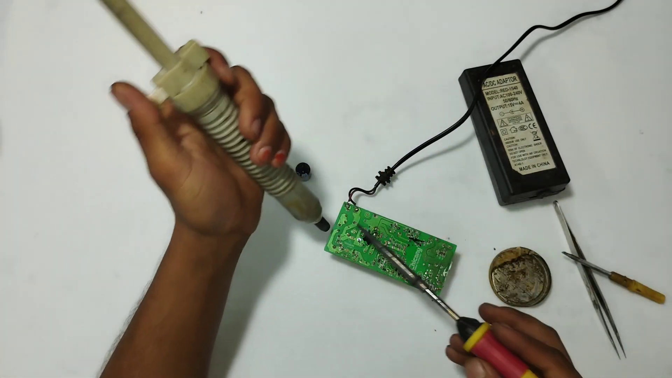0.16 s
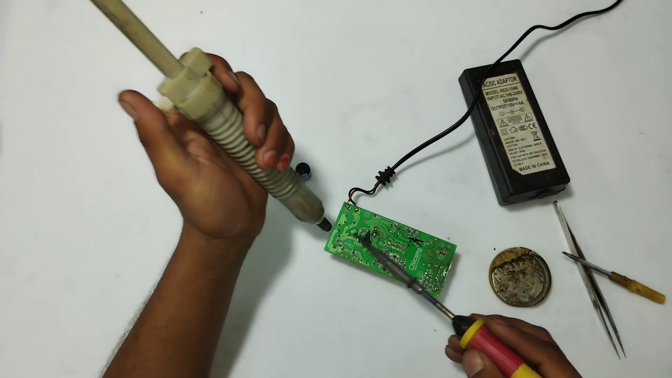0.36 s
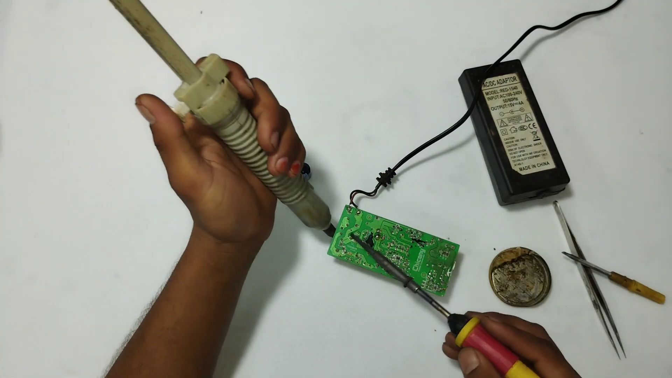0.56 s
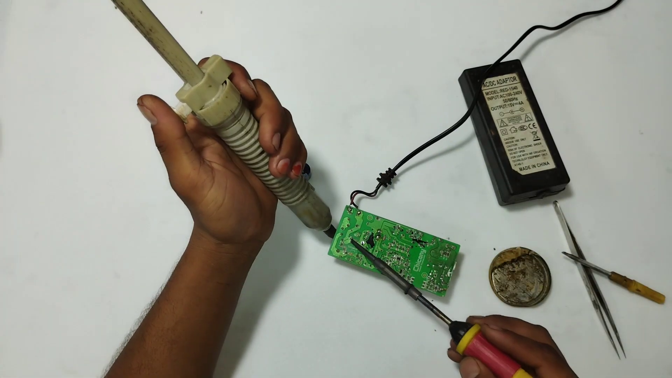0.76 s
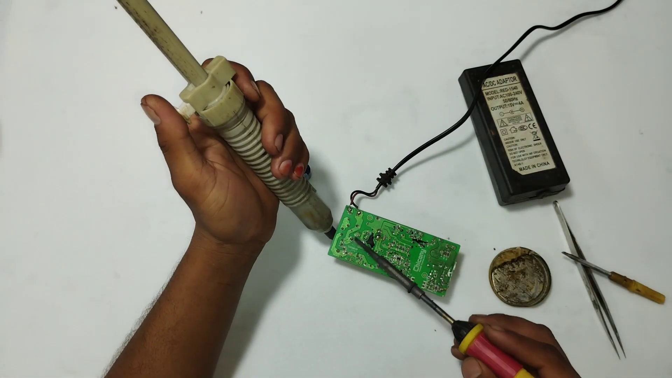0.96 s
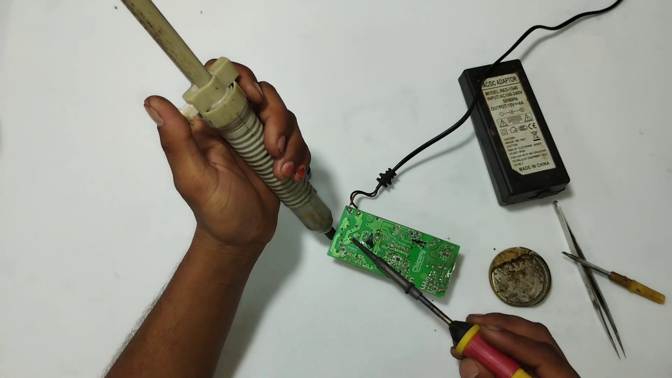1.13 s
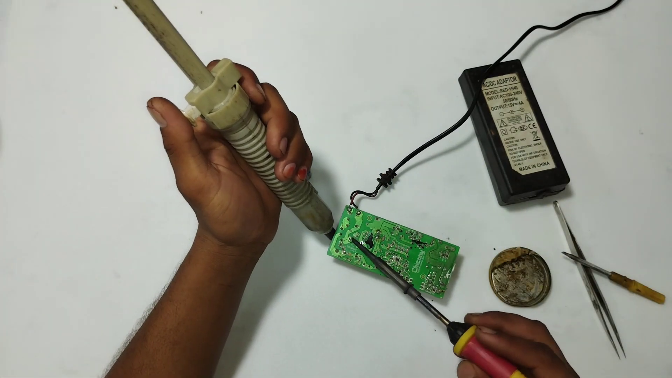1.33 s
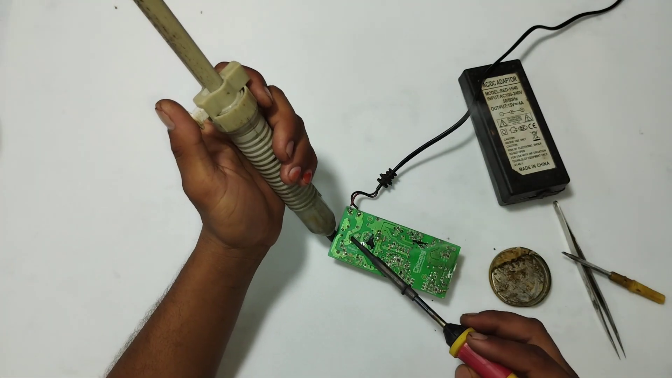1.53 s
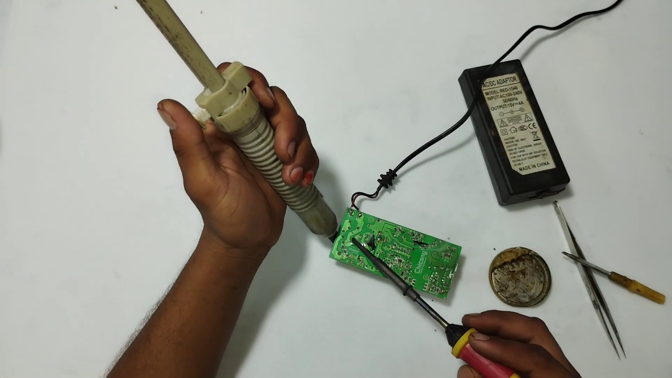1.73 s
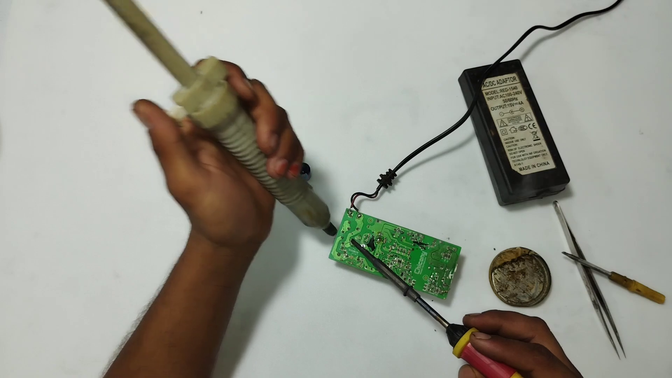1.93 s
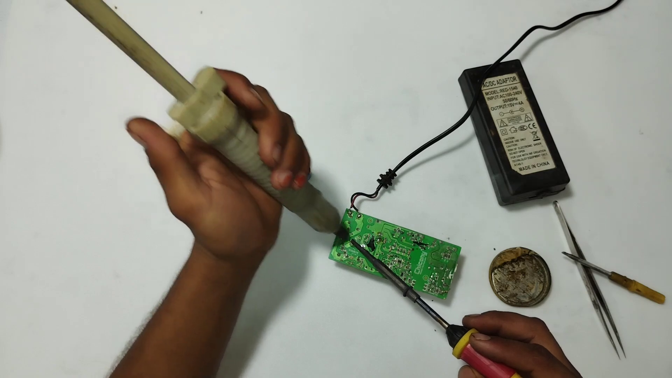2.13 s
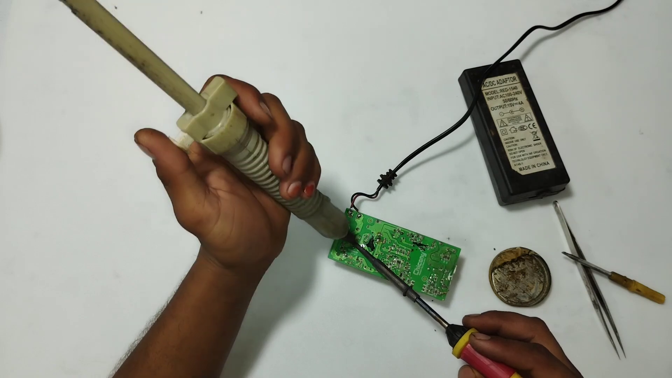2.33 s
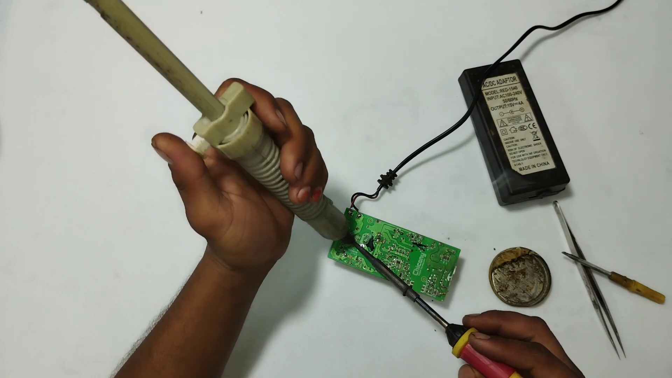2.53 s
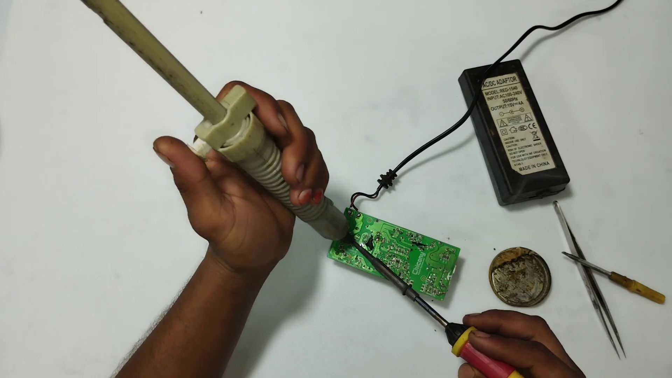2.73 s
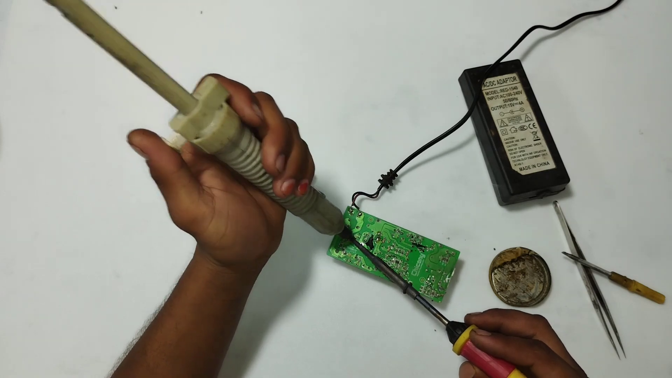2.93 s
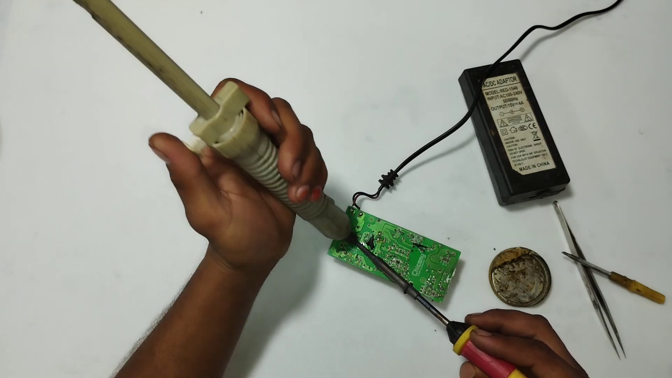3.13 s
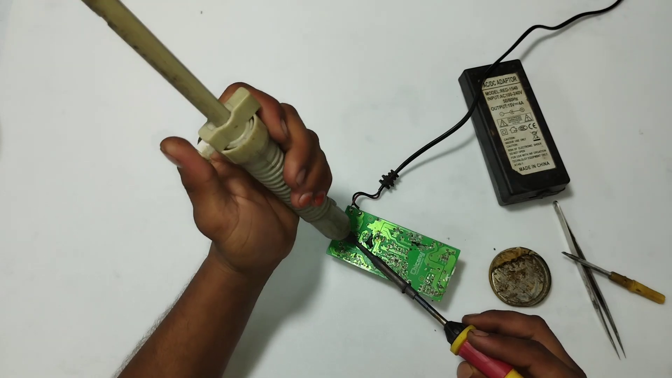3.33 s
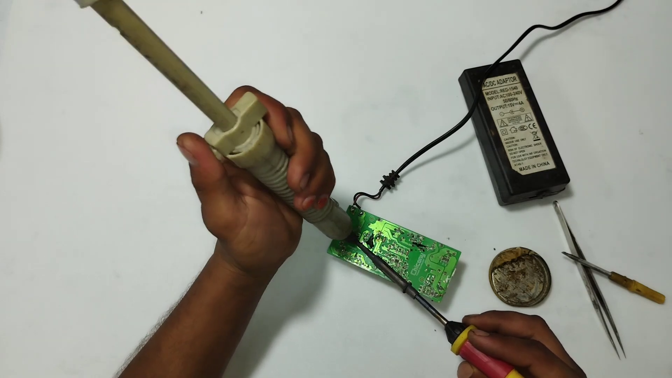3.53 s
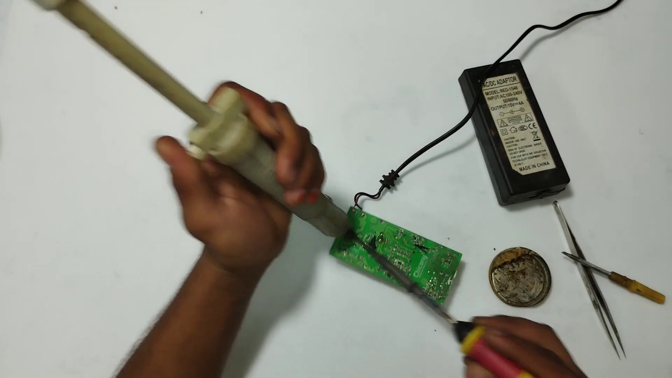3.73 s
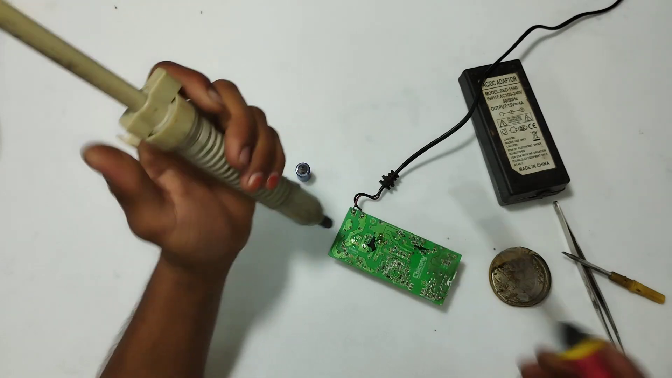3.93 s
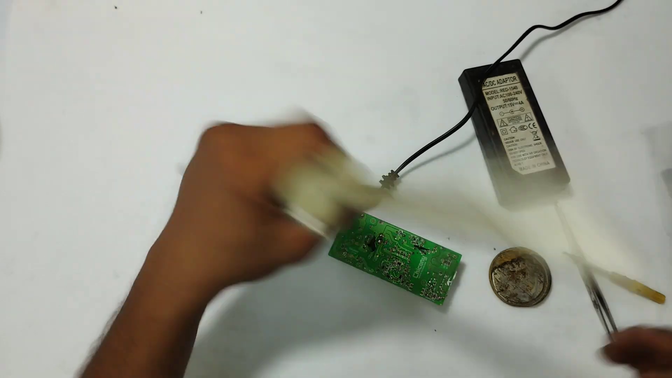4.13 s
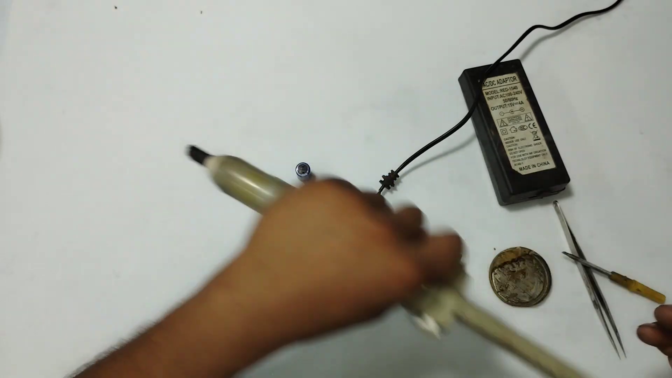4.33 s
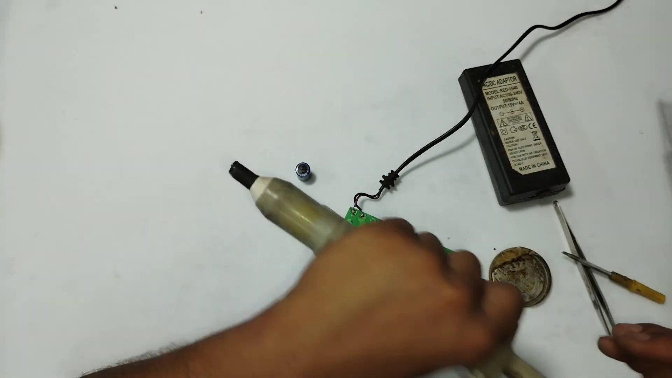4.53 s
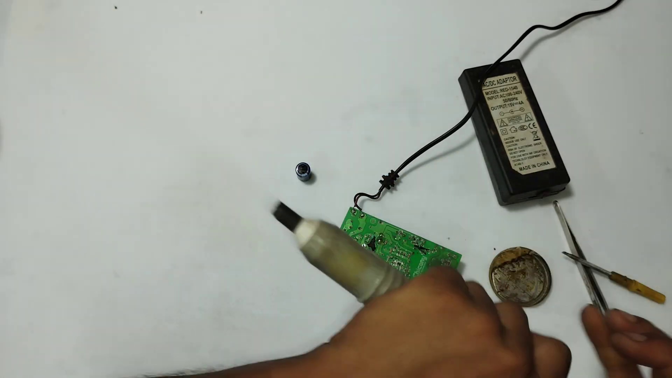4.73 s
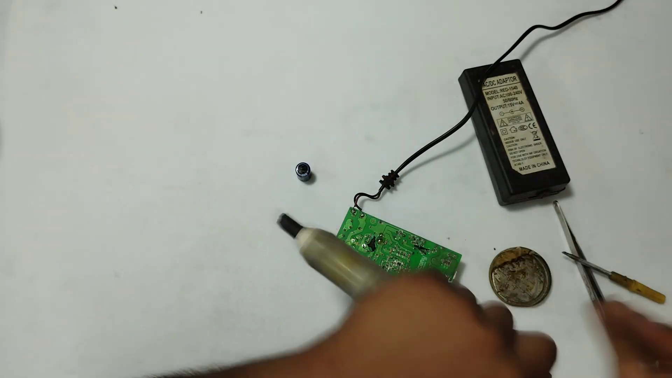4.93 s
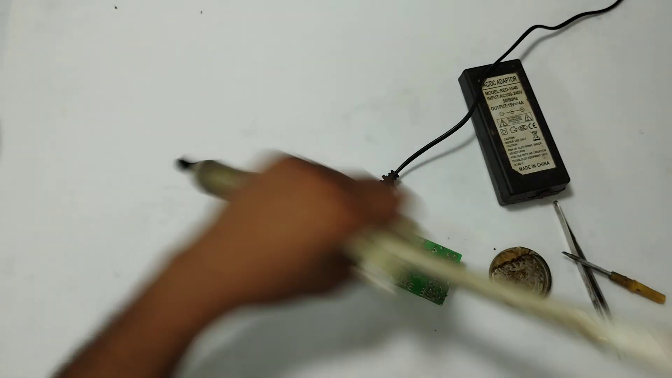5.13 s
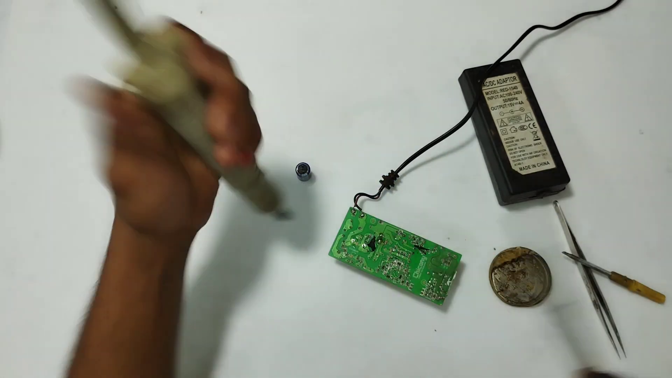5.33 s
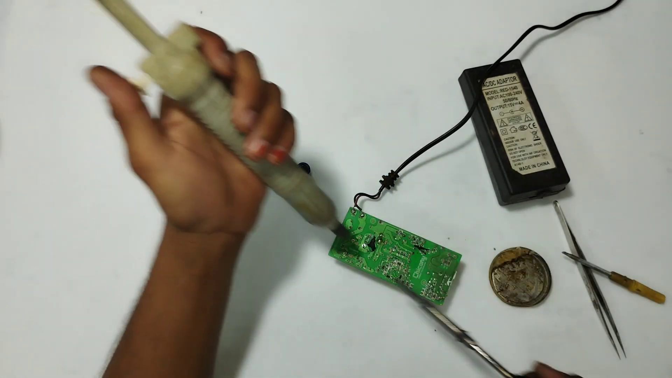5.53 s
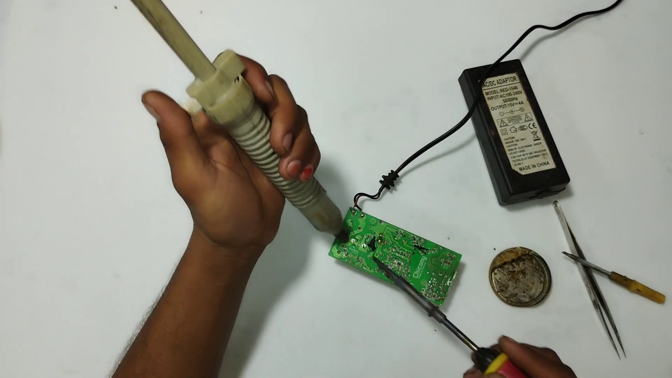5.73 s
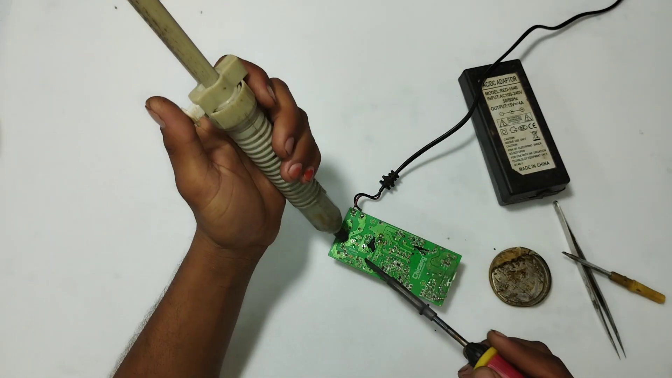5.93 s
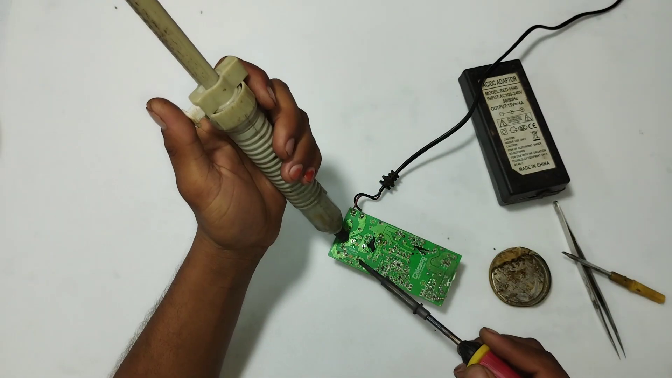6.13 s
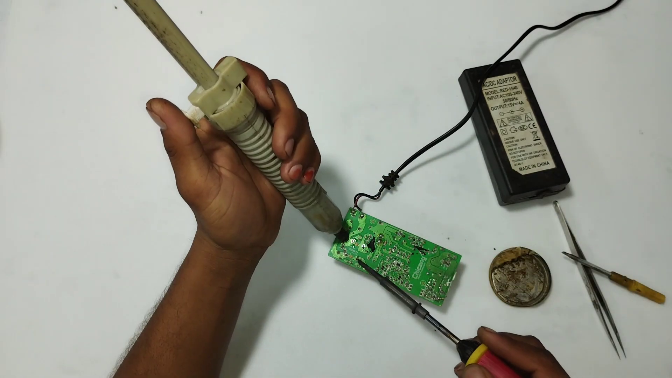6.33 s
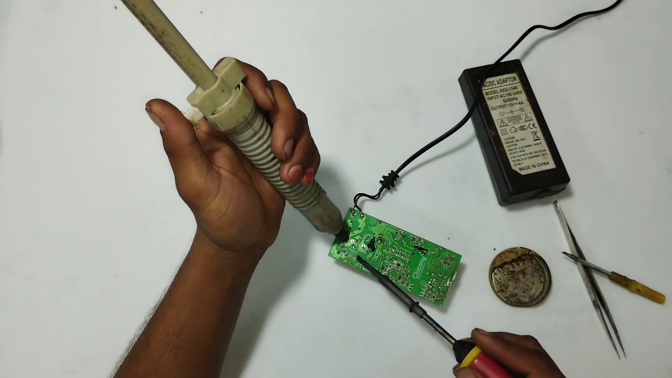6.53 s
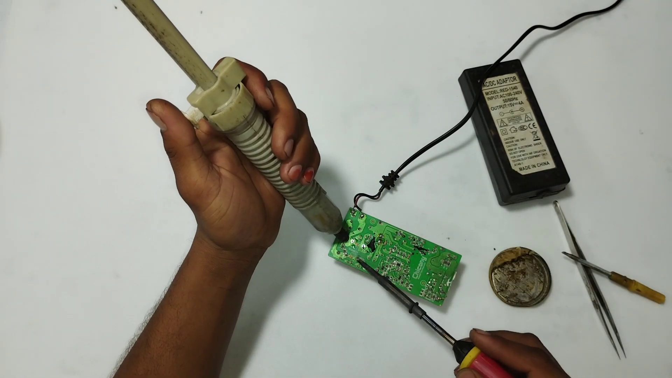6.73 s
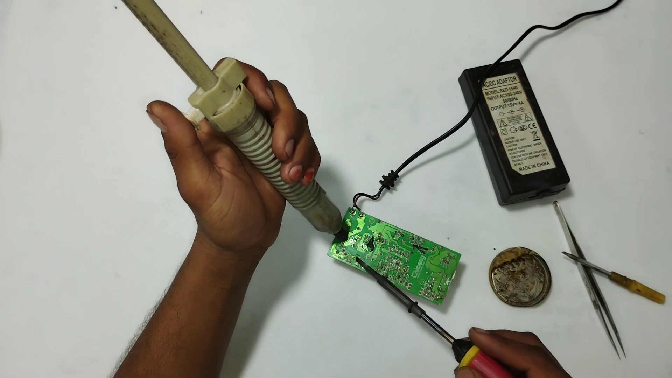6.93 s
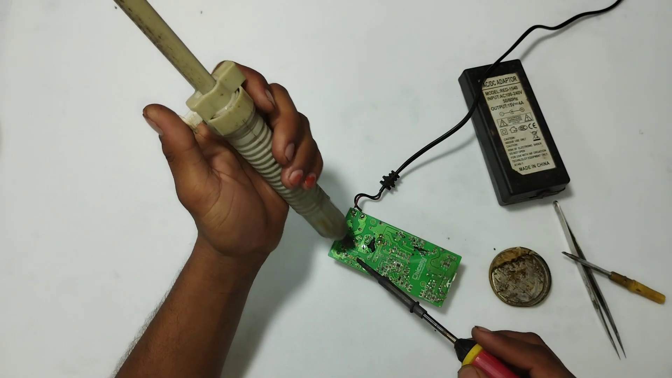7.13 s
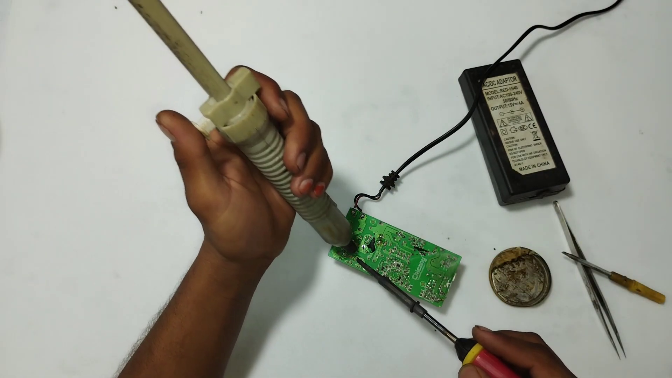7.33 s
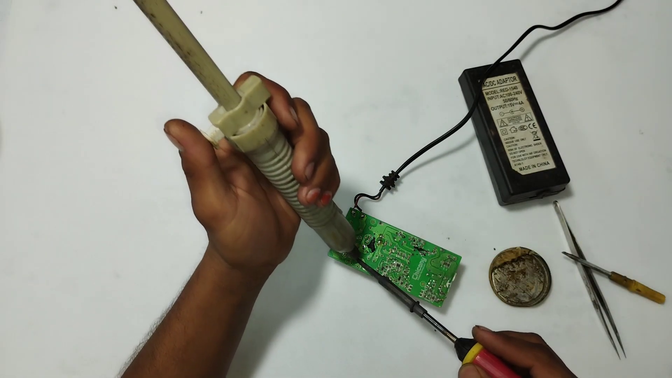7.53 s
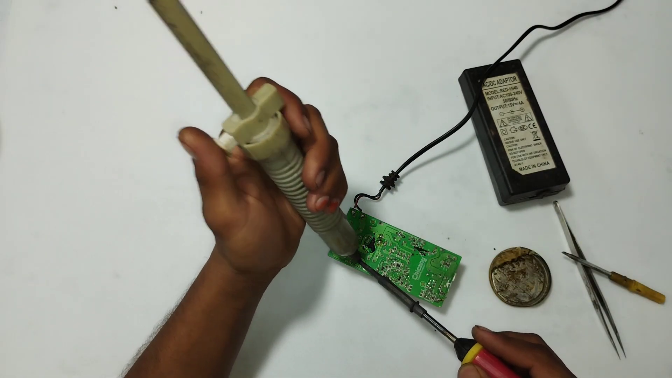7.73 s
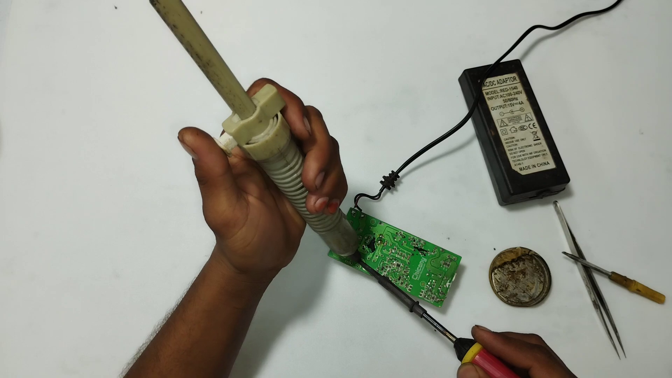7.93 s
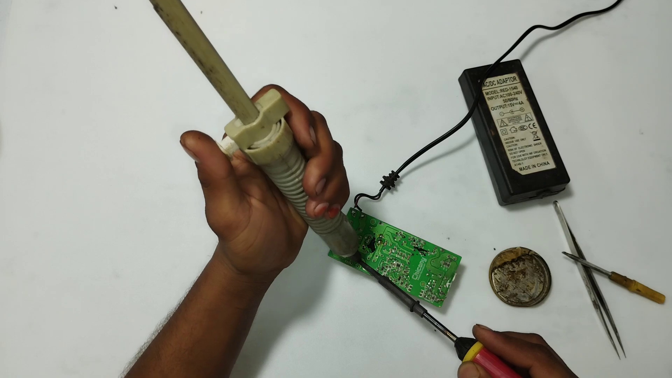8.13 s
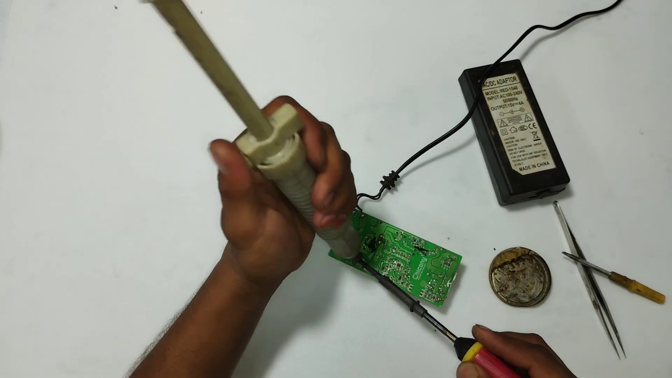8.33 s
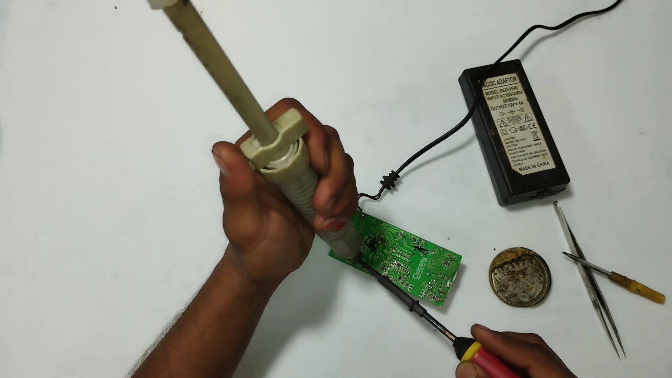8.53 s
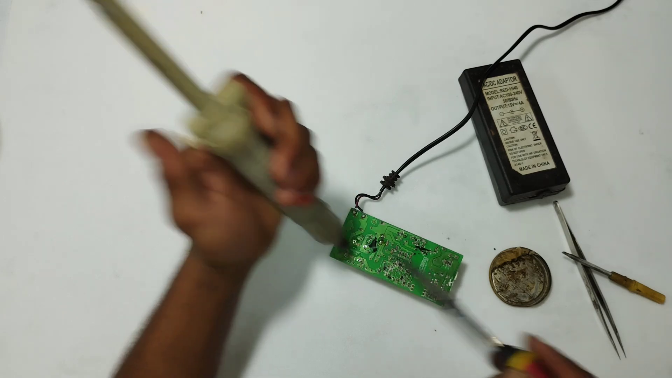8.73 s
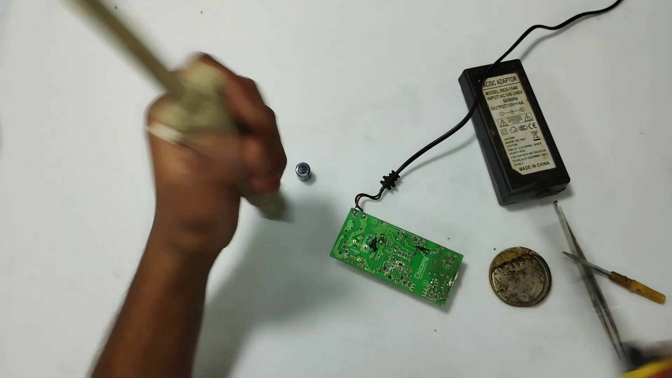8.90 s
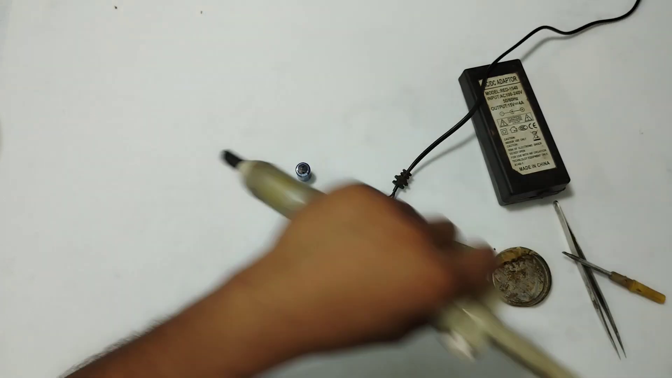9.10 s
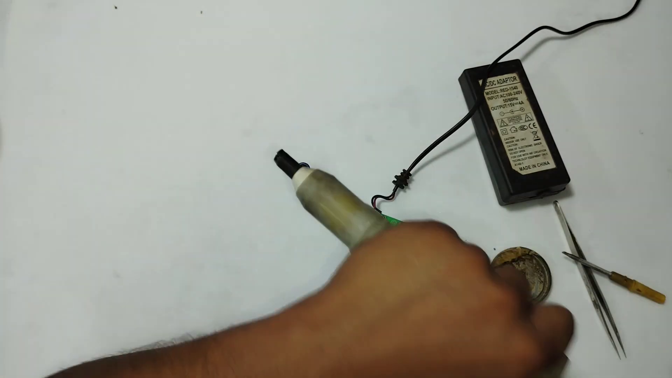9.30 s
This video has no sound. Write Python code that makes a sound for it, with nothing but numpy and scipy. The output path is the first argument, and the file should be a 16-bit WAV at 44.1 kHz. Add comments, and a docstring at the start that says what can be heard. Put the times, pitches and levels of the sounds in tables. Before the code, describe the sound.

Flux sizzles faintly on a circuit board, then a spring-loaded solder pump snaps, is re-cocked with airy whistling clicks, and snaps again.

```python
"""Desoldering at the bench

A small room, one microphone above the workbench, over low rumble and a faint fan whine.
Flux sizzles under the iron as steam noise and random bubble clicks; a few bubbles spit loudly.
The solder pump snaps: noise bursts and damped modes for piston and barrel, a low thump, a spring rebound.
Pushing the plunger in blows noise through a whistling nozzle, with latch clicks and seal squeaks.
Tools tick, and the circuit board knocks on the bench now and then."""
import sys
import numpy as np
from scipy import signal
from scipy.fft import rfft, irfft
from scipy.io import wavfile
from scipy.ndimage import map_coordinates

SR = 44100
rng = np.random.default_rng(int(sys.argv[2]) if len(sys.argv) > 2 else 0)


def master(y):
    """Save y as 16-bit WAV."""
    cut = np.clip(np.atleast_2d(y).T, -1, 1)
    pcm = np.round(cut * 32767)  # scale
    wavfile.write(sys.argv[1], SR, pcm.astype(np.int16))


N = 412776  # samples
T = np.arange(SR // 2) / SR  # time since a blow [s]


def amp(db):
    """Decibels to gain."""
    return 10 ** (np.asarray(db) / 20)


def unit(x):
    """Scale to rms 1."""
    return x / np.sqrt(np.mean(np.abs(x) ** 2) + 1e-20)


def along(points, hz):
    """Points (frequency [Hz], value) read on a log frequency axis."""
    f, v = np.transpose(points)
    return np.interp(np.log(hz + 1), np.log(f), v)


def wobble(rate):
    """A smooth random curve with rate knots a second."""
    knots = rng.standard_normal(int(N * rate / SR) + 4)
    return map_coordinates(knots, [np.arange(N) * rate / SR])


def add(track, s, sound):
    """Mix a sound into a track at s seconds, cut at the track's end."""
    room_left = track[round(s * SR):][:len(sound)]
    room_left += sound[:len(room_left)]


def colour(x, spectrum):
    """Causal minimum-phase filter with the gain of (frequency [Hz], gain [dB]) points."""
    size = 4096
    gain = amp(along(spectrum, np.fft.rfftfreq(size, 1 / SR)))
    cepstrum = irfft(np.log(gain))
    # folding the cepstrum makes the phase minimal
    cepstrum[1:size // 2] *= 2
    cepstrum[size // 2 + 1:] = 0
    impulse = irfft(np.exp(rfft(cepstrum)))
    return signal.fftconvolve(x, impulse)[:len(x)]


def tilted(spectrum, slope):
    """A spectrum made brighter by slope dB per octave, pivoting at 9 kHz."""
    return [(hz, db + slope * np.log2(hz / 9000)) for hz, db in spectrum]


def noise(spectrum):
    """Coloured noise of rms 1."""
    return unit(colour(rng.standard_normal(N), spectrum))


def narrow(hz, width):
    """Noise in one resonance, whose centre may move: two slow noises carried by a sine and cosine."""
    low_pass = signal.butter(2, width / 2, fs=SR, output="sos")
    base = signal.sosfilt(low_pass, rng.standard_normal((2, N)))
    phase = 2 * np.pi * np.cumsum(hz * np.ones(N)) / SR
    return unit(base[0] * np.cos(phase) + base[1] * np.sin(phase))


def burst(t60):
    """Contact noise that falls by 60 dB in t60 seconds."""
    return rng.standard_normal(len(T)) * 1000 ** (-T / t60)


def ring(modes):
    """Damped (frequency [Hz], width [Hz], level [dB]) modes, struck at slightly new strengths."""
    out = np.zeros(len(T))
    for hz, width, db in modes:
        strength = amp(db + rng.normal(0, 0.62)) * width
        phase = rng.uniform(0, 2 * np.pi)
        out += strength * np.exp(-np.pi * width * T) * np.sin(2 * np.pi * hz * T + phase)
    return out


def blow(x, db):
    """Scale a blow so that its first 6 ms have an rms of db."""
    return amp(db) * x / np.std(x[:SR * 6 // 1000])


# how long the small room rings: (frequency [Hz], t60 [s])
ROOM_DECAY = [(100, 0.39), (500, 0.18), (2000, 0.19), (8000, 0.18), (15000, 0.17)]


def room(x, wet_db):
    """The direct sound plus the diffuse answer of bench and walls, wet_db louder than the direct."""
    hz, t, z = signal.stft(rng.standard_normal(len(T)), SR, nperseg=256)
    decay = amp(-60 * t / along(ROOM_DECAY, hz)[:, None])
    tail = signal.istft(z * decay, SR, nperseg=256)[1][:len(T)]
    tail = tail * (1 - np.exp(-T / 0.00049))
    wet = signal.fftconvolve(x, tail / np.linalg.norm(tail))[:len(x)]
    return (x + amp(wet_db) * wet) / np.hypot(1, amp(wet_db))


# hollow ring of the bench: (frequency [Hz], relative level [dB], t60 [s])
BENCH_MODES = [(96, 4.5, 0.3), (119.2, -7, 0.25), (138, -9, 0.17), (193, -16, 0.08)]


def thump(rise):
    """The hollow low ring of the bench: decaying sines that swell in with time constant rise [s]."""
    modes = sum(amp(db - 60 * T / t60) * np.sin(2 * np.pi * hz * T) for hz, db, t60 in BENCH_MODES)
    return modes * (1 - np.exp(-T / rise))


# spectrum of the room rumble: (frequency [Hz], gain [dB])
RUMBLE_SPECTRUM = [(20, -3), (45, 1), (70, -18.5), (100, -0.5), (135, -13.5), (240, -29), (400, -27),
                   (800, -32.5), (2200, -36.5), (3800, -43.5), (8500, -43.5), (11000, -47), (15500, -47.5)]
# fan and mains lines: (frequency [Hz], rms level [dB])
HUM_LINES = [(102.3, -66), (387.6, -77.5), (592.2, -74), (640, -76), (985.1, -69), (1033, -82.5),
             (1082, -80.5), (2078, -82)]
# narrow noise bands of the fan and electronics: (frequency [Hz], width [Hz], rms level [dB])
WHINE_BANDS = [(410, 95, -73.5), (958, 43, -80.5), (7330, 720, -71)]


def ambience():
    """Low room rumble as coloured noise, and a faint fan as sines of wandering phase and narrow noise."""
    rumble = amp(-46.5 + 0.72 * wobble(3.3)) * noise(RUMBLE_SPECTRUM)
    t = np.arange(N) / SR
    lines = np.zeros(N)
    for hz, db in HUM_LINES:
        lines += amp(db) * np.sqrt(2) * np.sin(2 * np.pi * hz * t + 0.46 * wobble(2.6))
    whine = sum(amp(db) * narrow(hz, width) for hz, width, db in WHINE_BANDS)
    return rumble + lines + whine


# the circuit board knocks on the bench: (time [s], level of the first contact [dB])
BOARD_KNOCKS = [(1.128, -51.5), (1.542, -53), (3.426, -55.5), (3.857, -18), (6.332, -56)]
# resonances of the board: (frequency [Hz], width [Hz], relative level [dB])
BOARD_MODES = [(327, 24, -4.5), (401, 23, 1), (520, 30, -5.5), (761, 48, -4.5), (954, 45, -6),
               (1114, 45, -7), (1217, 60, -7.5), (1510, 65, -11)]
# spectrum of its contact noise: (frequency [Hz], gain [dB])
CLACK_SPECTRUM = [(100, -10.5), (200, -13.5), (380, 1), (620, -7), (950, -2), (1300, -10), (1800, -17.5),
                  (3300, -22), (4300, -30), (8200, -30.5), (15000, -50.5)]
BOUNCE_S, BOUNCE_LOSS_DB = .007, 6.5  # spacing of the board's chatter, and loss per contact


def knocks():
    """The board drops on the bench: three dull clacks of noise and board modes, over the bench thump."""
    out = np.zeros(N)
    for first_s, first_db in BOARD_KNOCKS:
        for k in range(3):
            s, db = first_s + k * BOUNCE_S, first_db - k * BOUNCE_LOSS_DB
            contact = unit(colour(burst(0.1), CLACK_SPECTRUM)) + amp(-1.5) * unit(ring(BOARD_MODES))
            soft = contact * (1 - np.exp(-T / .001))
            add(out, s, blow(room(soft, wet_db=-7.5), db) + amp(db - 8) * thump(rise=0.012))
    return out


# soft bumps inside the hollow pump body: (time [s], level before a 6 dB cut [dB])
PUMP_BUMPS = [(2.994, -46.5), (4.933, -24.5), (5.088, -38.5), (6.225, -50), (7.124, -44)]
# resonances of the cavity: (frequency [Hz], width [Hz], relative level [dB])
CAVITY_MODES = [(394, 30, 0), (520, 70, -14.5), (900, 120, -25.5), (1560, 80, -16.5)]


def bumps():
    """Soft bumps sound the pump's cavity: damped modes with a slow onset."""
    out = np.zeros(N)
    for s, db in PUMP_BUMPS:
        cavity = ring(CAVITY_MODES) * (1 - np.exp(-T / 0.0063))
        add(out, s, blow(room(cavity, wet_db=-12.0), db - 6))
    return out


# light ticks of the trigger and the tool tips:
# (time [s], level before a 4 dB cut [dB], resonance [Hz], resonance gain [dB])
TOOL_TICKS = [(1.129, -41.5, 1580, 5.5), (1.708, -44.5, 2820, 0), (3.468, -34.5, 3544, 13),
              (3.51, -37.5, 1500, -3), (3.693, -38.5, 4000, 4.5), (3.8187, -32.5, 3320, 14),
              (3.976, -50.5, 3800, 5.5), (4.203, -48, 5440, 3), (5.53, -48, 6900, 12),
              (6.225, -45.5, 2510, 9), (8.402, -48.5, 3540, 4), (8.412, -45.5, 3280, 11),
              (8.591, -32, 3740, 2), (8.86, -47.5, 3430, 6)]


def ticks():
    """Small contacts: short noise bursts, each with one broad resonance."""
    out = np.zeros(N)
    for s, db, hz, peak_db in TOOL_TICKS:
        body = [(hz / 6, -14), (hz / 2.5, -4), (hz / 1.4, 0), (hz / 1.1, peak_db),
                (hz * 1.1, peak_db), (hz * 1.4, 0), (hz * 2.3, -2), (hz * 4, -15)]
        contact = burst(t60=0.022) * (1 - np.exp(-T / 0.00029))
        add(out, s, blow(room(colour(contact, body), wet_db=-3), db - 4))
    return out


# the iron rests on a joint: (time [s], time on the joint [s], level before flash and boil gain [dB],
# time until the flux runs low [s], fade after that [dB/s], brightness [dB per octave])
IRON_TOUCHES = [(0.70, .325, -51.5, 0.2, 2, -1), (1.235, 2.25, -52, 1.33, 22.5, -0.1),
                (6.53, 2.2, -53, 0.5, 15, 0.5)]
# the loudest flux bubbles: (time [s], level [dB])
LOUD_SPITS = [(1.337, -45.5), (1.7469, -40), (1.9394, -39), (2.0906, -45.5), (2.158, -45), (2.306, -41),
              (2.3482, -40), (2.4297, -43), (2.597, -45.5), (2.7457, -41.5), (2.8881, -43), (3.3007, -45),
              (6.915, -43), (7.333, -49), (7.4177, -53), (7.7053, -50), (7.896, -48.5)]
# spectra of the bubbles and of the steam: (frequency [Hz], gain [dB])
BUBBLE_SPECTRUM = [(1500, -28), (3000, -6), (4500, -5), (6200, 0), (8500, 5), (11000, 1.5), (13000, 1),
                   (15500, -4.5)]
STEAM_SPECTRUM = [(1500, -28), (4000, -17), (6200, -6), (7500, -5.5), (8700, 3.5), (9600, -2.5),
                  (11500, -1.5), (12800, 1), (15500, 1.5)]
WET_S, LIFT_S = 0.019, .018  # the hiss rises as the tip wets, and dies when it lifts
FLASH_DB, FLASH_AT_S, FLASH_WIDTH_S = 4.5, 0.1, 0.035  # fresh flux flashes off just after the touch
# steam gives way to bubbles as the joint heats
FIRST_SHARE, SHARE_PER_S, LAST_SHARE = 0.27, 0.57, 0.83
BOIL_DB = 2.5  # extra gain per unit share of bubbles
BUBBLES_PER_S, THINNING = 120, .75  # bubbles grow sparse as the flux dries up


def sizzle():
    """At each touch the flux steams (noise), boils (random clicks) and dries up; a few bubbles spit loudly."""
    steam, crackle, spits = np.zeros((3, N))
    age = np.arange(N) / SR  # time since the touch
    share = np.clip(FIRST_SHARE + SHARE_PER_S * age, 0, LAST_SHARE)
    flash_db = FLASH_DB * np.exp(-((age - FLASH_AT_S) / FLASH_WIDTH_S) ** 2)
    for s, length, db, supply, fade, slope in IRON_TOUCHES:
        wetting = np.minimum(age / WET_S, 1) ** 2
        lifting = np.exp(-np.maximum(age - length, 0) / LIFT_S)
        flux_left = amp(-fade * np.clip(age - supply, 0, length))
        heat = wetting * lifting * flux_left * amp(db + flash_db + BOIL_DB * share)
        rate = BUBBLES_PER_S * flux_left ** THINNING
        sizes = amp(np.minimum(5 * rng.exponential(size=N), 11)) * rng.choice([-1, 1], N)
        bubbles = (rng.random(N) < rate / SR) * sizes / np.sqrt(rate)
        boil = unit(colour(bubbles, tilted(BUBBLE_SPECTRUM, slope)))
        add(crackle, s, heat * np.sqrt(share) * boil)
        add(steam, s, heat * np.sqrt(1 - share) * noise(tilted(STEAM_SPECTRUM, slope)))
    for s, db in LOUD_SPITS:
        spit = colour(burst(t60=.007), BUBBLE_SPECTRUM)
        add(spits, s, blow(room(spit, wet_db=-1), db))
    return room(crackle, wet_db=3) + room(steam, wet_db=3) + spits


# pushes on the plunger: (time [s], time to full speed [s], length [s], air flow [dB],
# nozzle resonance at the start [Hz], whistle level re the jet [dB], blur of the whistle [0-1])
PLUNGER_STROKES = [(4.554, 0.027, 0.051, -18, 2430, -18.5, .2),
                   (4.698, .135, .227, -12.5, 2427, -18.5, 0.05),
                   (5.077, 0.0043, 0.011, -26, 2304, -8.5, 0.27),
                   (5.135, 0.029, 0.098, -10, 2296, -21.5, 1), (9.334, 0.024, 0.07, -11.5, 2480, -22.5, .3)]
BREAKAWAY_DB = -22  # air flow as the seal starts to slide
ATTACK_DB_PER_S, RELEASE_DB_PER_S = 2399, 951  # the flow sets in and stops
SAG_HZ_PER_S = 1100  # the nozzle resonance sinks along a push


def pushes():
    """Air flow and the whistle's pitch, level and blur: each push breaks away, speeds up, holds and stops."""
    t = np.arange(N) / SR
    flow, nozzle_hz, whistle_db, blur = np.zeros((4, N))
    for s, rise, length, db, hz, tone_db, smear in PLUNGER_STROKES:
        age = t - s
        edges_db = ATTACK_DB_PER_S * np.maximum(-age, 0) + RELEASE_DB_PER_S * np.maximum(age - length, 0)
        push = amp(np.interp(age, [0, rise], [BREAKAWAY_DB, db]) - edges_db)
        now = push > flow  # the strongest push rules
        flow[now], whistle_db[now], blur[now] = push[now], tone_db, np.clip(smear, 0, 1)
        nozzle_hz[now] = hz - SAG_HZ_PER_S * np.clip(age[now], 0, length)
    return flow, nozzle_hz, whistle_db, blur


# spectra of the air jet, slow and fast: (frequency [Hz], gain [dB])
SLOW_JET_SPECTRUM = [(200, -29), (1000, -25.5), (2000, -26), (3300, -14), (4800, -5), (5500, -9.5),
                     (7000, -0.5), (8300, 4.5), (10000, 3.5), (12500, -16.5), (15500, -22.5)]
FAST_JET_SPECTRUM = [(1000, -28.5), (4000, -13.5), (7500, 2), (10000, -1), (12300, 0.5), (13500, -3),
                     (15500, -8)]


def air():
    """Air rushes out of the nozzle, its colour shifting with speed; the nozzle whistles and the rod scrapes."""
    flow, nozzle_hz, whistle_db, blur = pushes()
    fast = flow / (flow + amp(-19.0))  # share of fine turbulence
    jet = np.sqrt(1 - fast) * noise(SLOW_JET_SPECTRUM) + np.sqrt(fast) * noise(FAST_JET_SPECTRUM)
    flutter = 1 + .025 * wobble(110)
    clear_mode = narrow(nozzle_hz * flutter, 290)
    smeared_mode = narrow(nozzle_hz, 1000)
    first_mode = np.sqrt(1 - blur) * clear_mode + np.sqrt(blur) * smeared_mode
    second_mode = narrow(2.07 * nozzle_hz * flutter, 450)
    whistle = amp(whistle_db - 1.5) * (first_mode + amp(-1.0) * second_mode)
    slips = (rng.random(N) < 700 / SR) * rng.choice([-1, 1], N)  # tiny slips of the rod, 700 a second
    grit = unit(colour(slips, FAST_JET_SPECTRUM))
    scrape = amp(1.5 * wobble(900) + 1.6 * wobble(170))
    return flow * scrape * (amp(-1.5) * jet + whistle + amp(-11) * grit)


# the seal squeaks during a push: (time of the middle [s], level [dB], pitch [Hz], half-length [s])
SEAL_SQUEAKS = [(4.601, -15.5, 8000, 0.016), (5.192, -14.5, 7860, .02), (9.351, -7, 8370, 0.0033)]


def squeaks():
    """The sliding seal squeaks: narrow noise in a bell-shaped swell."""
    out = np.zeros(N)
    for s, db, hz, length in SEAL_SQUEAKS:
        swell = np.exp(-((np.arange(N) / SR - s) / length) ** 2)
        out += amp(db) * swell * narrow(hz, 350)
    return out


# the plunger catches and bottoms out: (time [s], level [dB], weight of the low clack [dB])
LATCH_CATCHES = [(4.605, -14, 7), (4.729, -21, -0.5), (4.7623, -16.5, -11.5), (4.883, -24, -8.5),
                 (4.926, -9.5, -1), (4.931, -18, 2.5), (5.082, -12, 1.5), (5.2394, -16, 2.5)]
# spectrum of the latch: (frequency [Hz], gain [dB])
LATCH_SPECTRUM = [(120, -24), (400, -12), (900, -7), (1400, -8.5), (3000, -3.5), (4200, -7), (6300, 4.5),
                  (8300, 4.5), (12000, 0), (15500, -3.5)]


def plunger():
    """The plunger goes in: air and squeaks in the room, and short noise bursts as the latch catches."""
    out = room(air() + squeaks(), wet_db=-5.5)
    for s, db, clack_db in LATCH_CATCHES:
        # the clack weight acts below 2 kHz
        latch = [(hz, level + clack_db * (hz < 2000)) for hz, level in LATCH_SPECTRUM]
        click = colour(burst(t60=0.02), latch)
        add(out, s, blow(room(click, wet_db=-2.5), db))
    return out


# the piston slams back up the barrel:
# (time [s], level [dB], t60 of the slam [s], barrel ring level [dB], thump level [dB])
PISTON_SLAMS = [(3.533, -8.5, 0.05, -22, -20), (8.456, -13, 0.082, -19, -15),
                (8.4616, -15, 0.041, -24, -37.5)]
# spectrum of the slam: (frequency [Hz], gain [dB])
SLAM_SPECTRUM = [(60, -1.5), (140, -1), (260, -9.5), (750, -8), (1150, -15), (1900, -8), (2900, -3),
                 (4300, -10.5), (6000, 1.5), (8500, -0.5), (12000, -4.5), (15500, -6.5)]
# resonances of the barrel: (frequency [Hz], width [Hz], relative level [dB])
BARREL_RING = [(205.8, 26, -2), (380, 20, -10.5), (517, 32, -8.5), (833, 45, -10), (951, 50, -1),
               (1814, 60, -2.5), (2064, 55, -3), (2730, 220, 0), (3480, 140, -1.5), (4216, 140, -6.5)]
# the piston rebounds on its steel spring: (time [s], level [dB])
SPRING_REBOUNDS = [(3.5544, -10.5), (3.56, -22), (8.4746, -8.5)]
# spectrum of the spring: (frequency [Hz], gain [dB])
SPRING_SPECTRUM = [(1000, -36.5), (4000, -15.5), (7000, -10.5), (9000, -2), (9800, 2.5), (10800, -9.5),
                   (12000, -15.5), (15500, -15)]


def snaps():
    """The freed piston slams home (noise), rings the barrel, shakes the bench and rebounds on the spring."""
    out = np.zeros(N)
    for s, db, t60, ring_db, thump_db in PISTON_SLAMS:
        slam = burst(t60) * (1 - np.exp(-T / 0.0032))
        barrel = ring(BARREL_RING) * (1 - np.exp(-T / 0.0013))
        add(out, s, blow(room(colour(slam, SLAM_SPECTRUM), wet_db=-4), db))
        add(out, s, blow(room(barrel, wet_db=-8), ring_db))
        add(out, s, amp(thump_db) * thump(rise=0.017))
    for s, db in SPRING_REBOUNDS:
        rebound = colour(burst(t60=0.0036), SPRING_SPECTRUM)
        add(out, s, blow(room(rebound, wet_db=4.0), db))
    return out


def scene():
    """One microphone above the bench feeds both channels."""
    mono = ambience() + knocks() + bumps() + ticks() + sizzle() + plunger() + snaps()
    return np.array([mono, mono])


def record(dry):
    """The loudest peaks are rounded off towards 0.9 of full scale, then the band is limited to 15.6 kHz."""
    clipped = dry / (1 + np.abs(dry / .9) ** 5) ** (1 / 5)
    low_pass = signal.firwin(501, 15600, fs=SR, window="blackman")
    return signal.fftconvolve(clipped, low_pass[None], "same", axes=1)


dry = scene()
out = record(dry)
master(out)
```